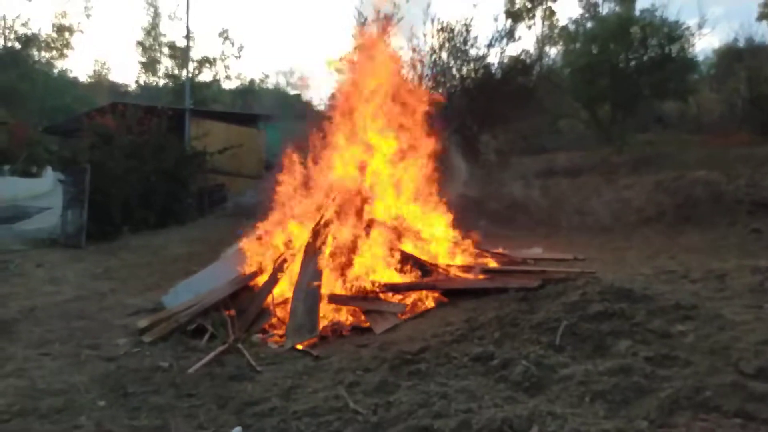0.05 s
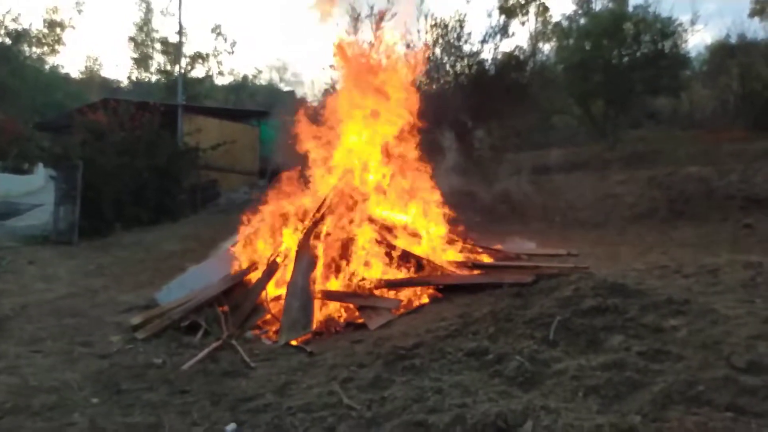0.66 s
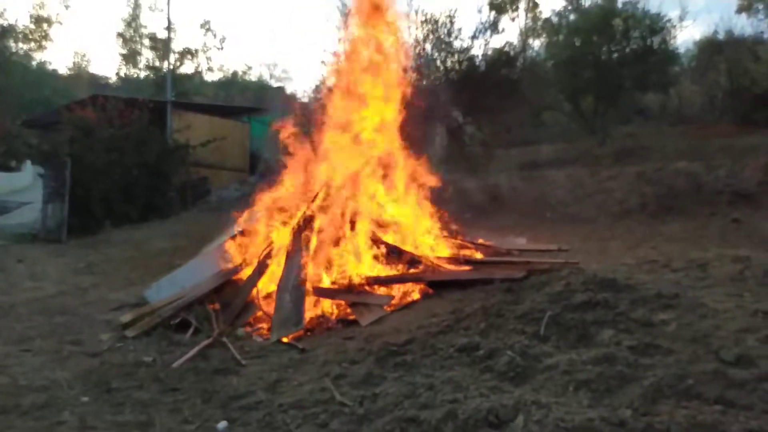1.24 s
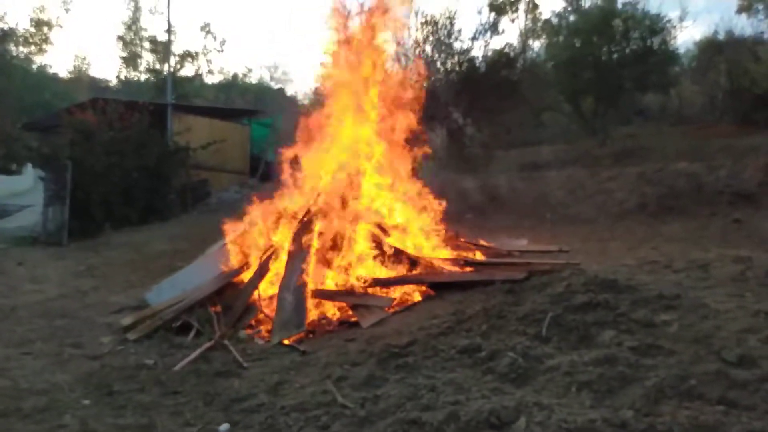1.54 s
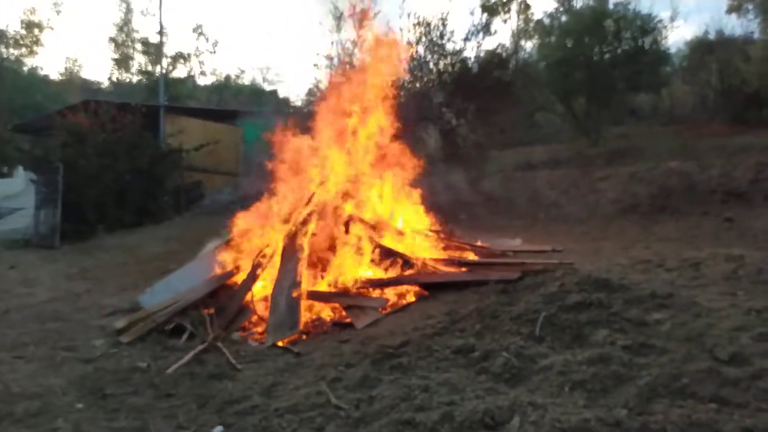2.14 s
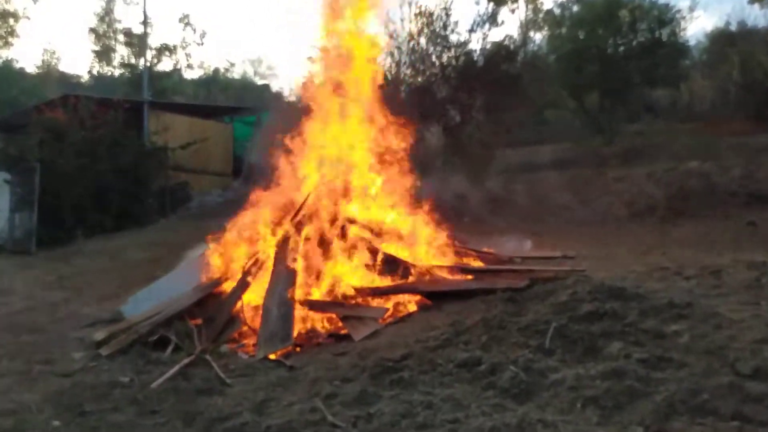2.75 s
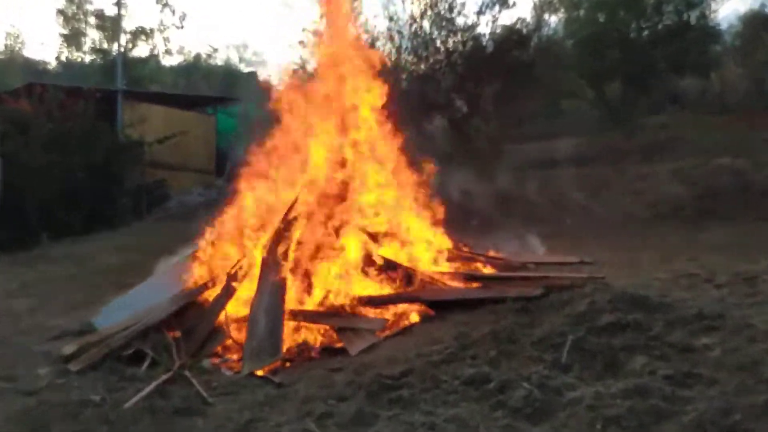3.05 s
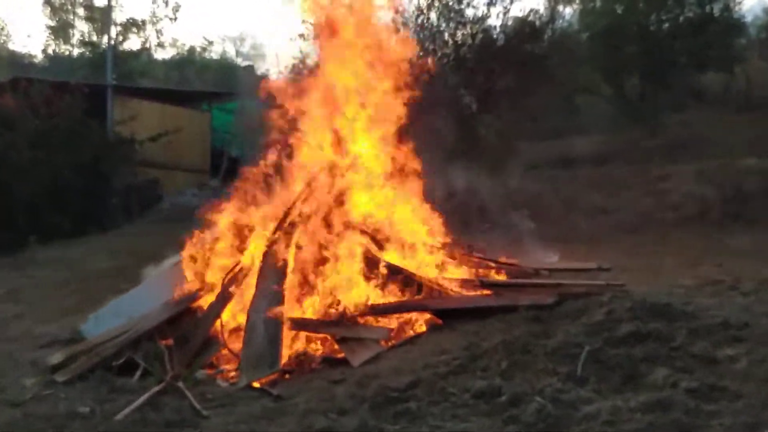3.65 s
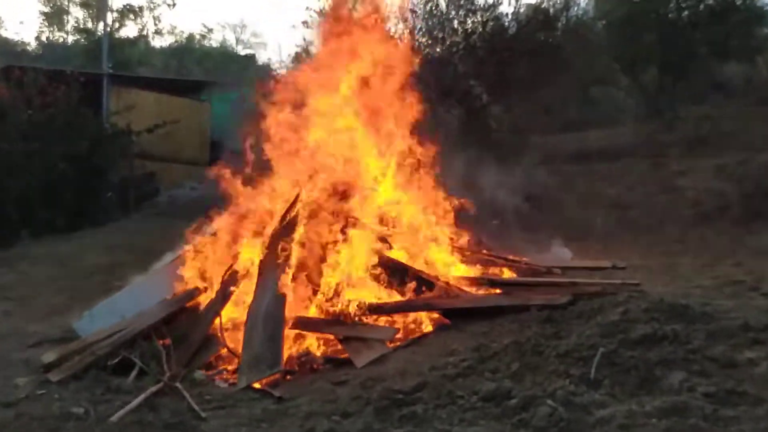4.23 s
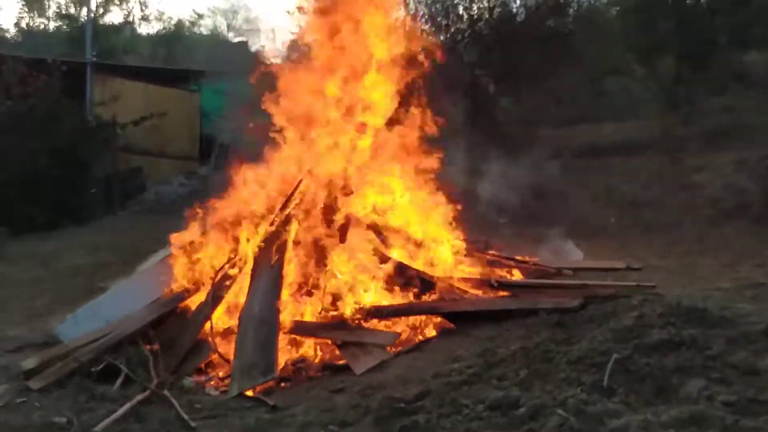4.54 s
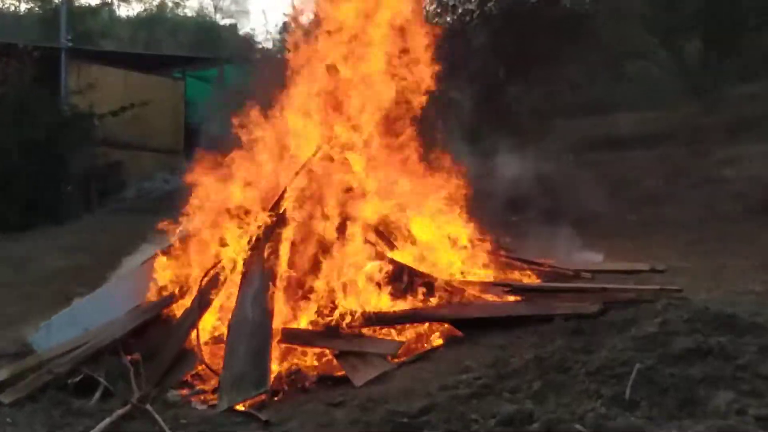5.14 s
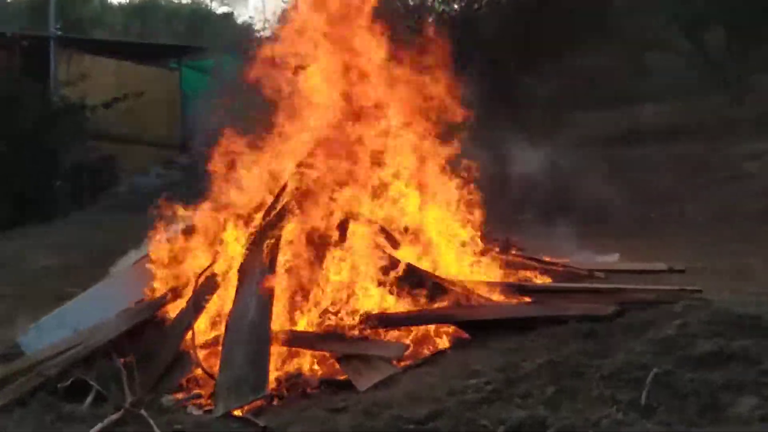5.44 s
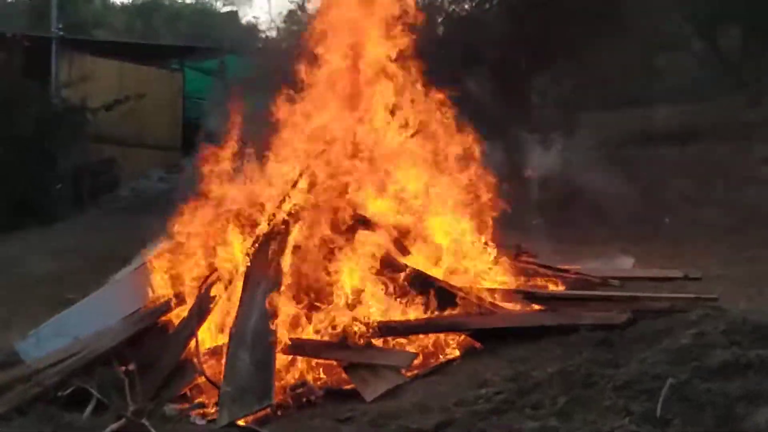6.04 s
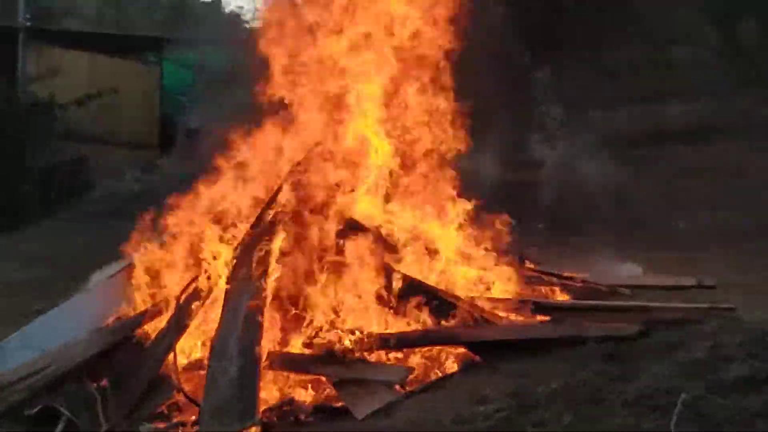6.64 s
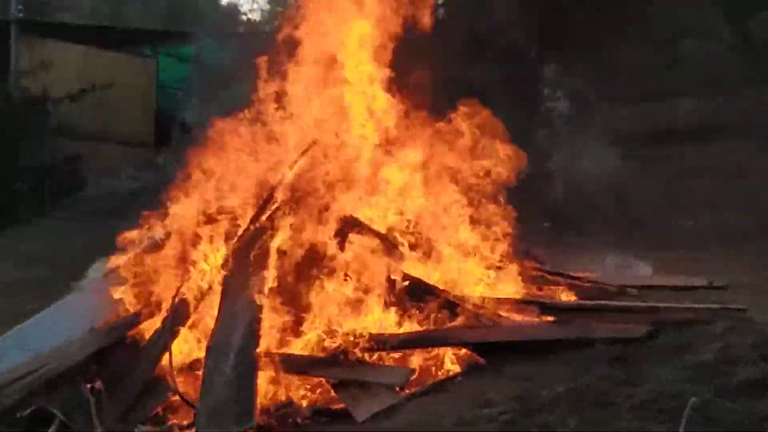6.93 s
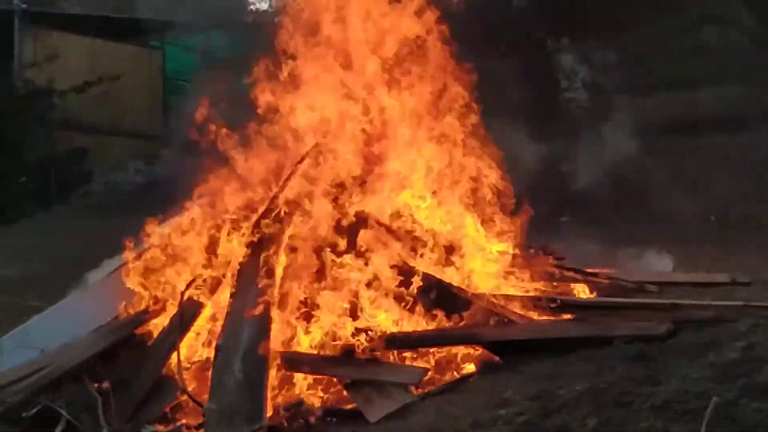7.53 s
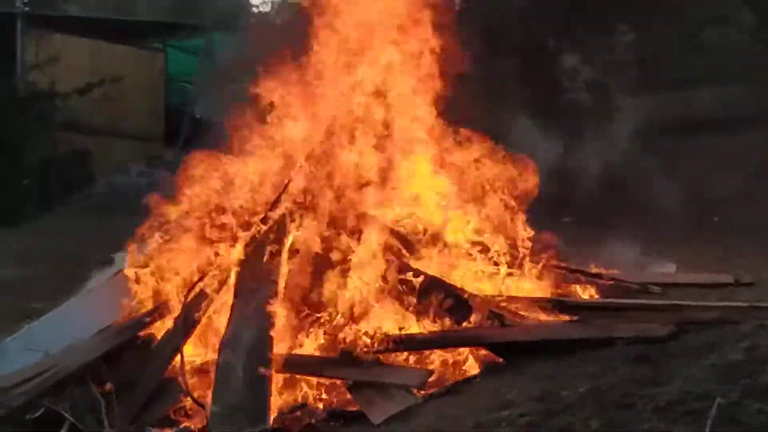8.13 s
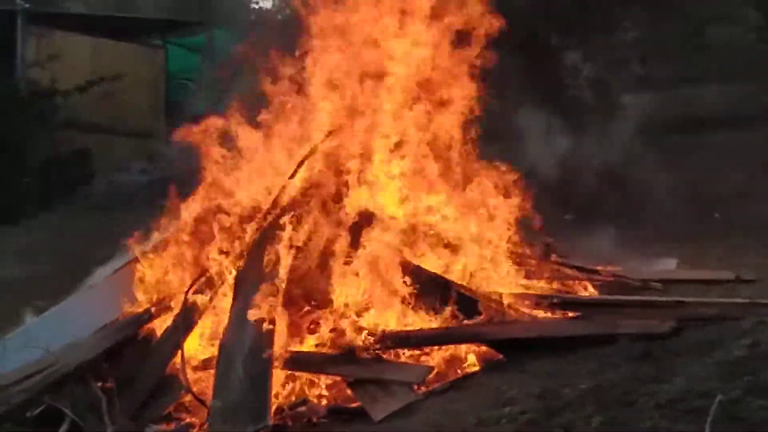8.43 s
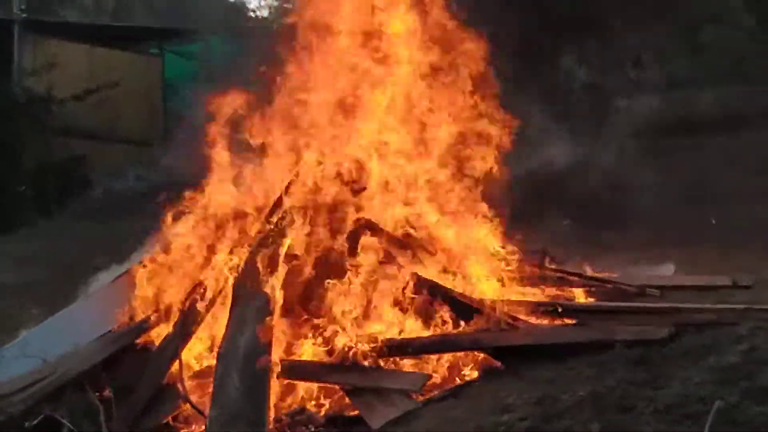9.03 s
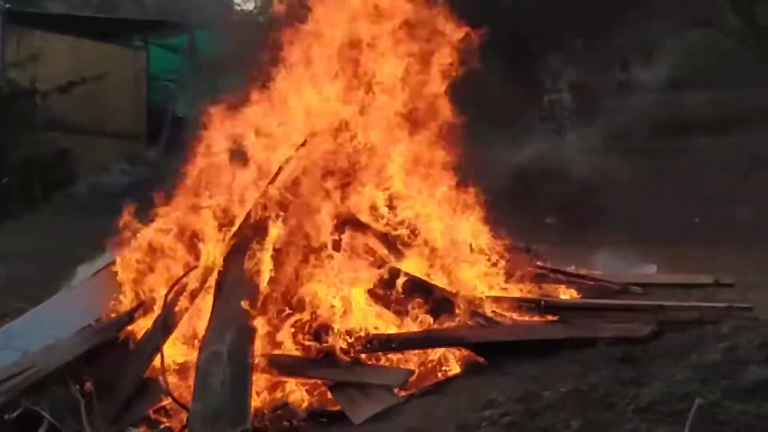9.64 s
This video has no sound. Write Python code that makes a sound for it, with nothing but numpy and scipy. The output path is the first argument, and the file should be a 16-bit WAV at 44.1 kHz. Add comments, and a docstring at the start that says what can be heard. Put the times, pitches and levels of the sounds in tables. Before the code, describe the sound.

A bonfire of old planks burns on open ground a few metres away, crackling without a break for about ten seconds. Sharp wooden cracks and bright snaps come irregularly, roughly a dozen a second, with many smaller pops between them. Beneath are a fine ticking sizzle and the soft, steady low rumble of flames. Stronger pops stand out around 0.5, 0.9, 1.9, 2.5, 5.5, 6.4 and 7.9 seconds. Occasional duller knocks from thick wood blend in, for example near 0.2, 2.3, 3 and 7.1 seconds. Steam sputters briefly and faintly around 1.3, 3.7 and 6.2 seconds. The sizzle swells and eases slightly, but the fire stays even overall. The sound is crisp and dry, with only a slight scatter off the ground.

```python
"""On open ground, a few metres away, a bonfire of old planks burns.
Pockets of steam and resin burst in the wood, and each sudden release of stress radiates a pop:
a crack of the plank plus a bright snap of splitting fibres, scattered back by the rough ground.
Deeper splits knock and escaping steam sputters. Small pops and a ticking sizzle fill the gaps,
over the soft rumble of turbulent flames."""
import sys
import numpy as np
from scipy import signal
from scipy.fft import rfft, irfft, next_fast_len
from scipy.io import wavfile

SR = 44100
rng = np.random.default_rng(int(sys.argv[2]) if len(sys.argv) > 2 else 0)


def transcribe(u):
    """Save the signal u as a 16-bit wav file named by the first command-line argument.

    u: samples, shape (n,) or (channels, n), limited to [-1, 1]; the rate is SR.
    q: integer samples, one column per channel.
    """
    v = np.clip(np.atleast_2d(u).T, -1, 1)
    q = np.round(v * 32767).astype(np.int16)
    wavfile.write(sys.argv[1], SR, q)


N = 431298

# loud ruptures: start_s, crack_db, snap_db
LOUD_POPS = [(0.0186, -28, -28), (0.069, -54, -25), (0.139, -35, -20), (0.2685, -27.5, -37),
             (0.3528, -23.5, -22.5), (0.466, -22.5, -26.5), (0.4998, -15, -20), (0.59, -19, -13.5),
             (0.6357, -25, -20.5), (0.716, -36, -28.5), (0.8308, -22.5, -34), (0.863, -21, -12),
             (0.876, -24.5, -25), (0.921, -23, -32), (1.0416, -33.5, -73), (1.104, -27, -25),
             (1.1373, -23, -25), (1.236, -20, -18), (1.385, -21, -22), (1.4405, -25, -26.5),
             (1.4881, -26.5, -65), (1.579, -29.5, -29.5), (1.7516, -23.5, -19), (1.797, -36, -21.5),
             (1.8719, -16.5, -11.5), (2.0917, -27, -17.5), (2.1102, -16, -45), (2.139, -23, -27),
             (2.2044, -34, -17), (2.2169, -27.5, -17), (2.3642, -22, -42), (2.3865, -19.5, -24),
             (2.5008, -28, -18), (2.5283, -15, -19), (2.6002, -28.5, -21.5), (2.644, -25, -54),
             (2.7986, -30, -71), (3.083, -28, -15.5), (3.2217, -30.5, -30), (3.3434, -28, -21.5),
             (3.3947, -26, -32), (3.533, -27, -55), (3.5864, -31.5, -22), (3.6997, -28, -14.5),
             (3.8061, -25.5, -13.5), (3.9529, -22, -37), (4.0268, -16.5, -18.5), (4.043, -29.5, -24),
             (4.1451, -25.5, -26), (4.1973, -28.5, -22), (4.2807, -25, -19), (4.357, -29, -22.5),
             (4.4273, -26, -28.5), (4.527, -22.5, -24), (4.6004, -19.5, -29.5), (4.6726, -26.5, -20),
             (4.7063, -25.5, -31), (4.9059, -30, -48), (4.9622, -53, -20), (4.9774, -19, -48),
             (5.0721, -28.5, -13.5), (5.1469, -21, -45), (5.3017, -30.5, -19.5), (5.387, -32, -62),
             (5.5177, -20, -13.5), (5.6187, -24.5, -17.5), (5.6386, -29, -21), (5.802, -34, -28),
             (5.8687, -26.5, -13.5), (6.033, -17.5, -16), (6.097, -23, -25), (6.135, -24.5, -14),
             (6.1481, -21.5, -47), (6.2541, -24, -54), (6.307, -29, -21), (6.359, -24, -36),
             (6.369, -12.5, -19.5), (6.5051, -27.5, -19.5), (6.5731, -28.5, -17), (6.6419, -26, -13.5),
             (6.7653, -19.5, -17), (6.8128, -27.5, -21), (6.8845, -18, -53), (6.942, -48, -24),
             (7.1316, -22.5, -16), (7.2463, -19, -22.5), (7.2825, -28, -25), (7.3784, -21.5, -18.5),
             (7.4334, -23.5, -14.5), (7.4467, -22, -18), (7.5068, -26.5, -20.5), (7.5184, -32.5, -17),
             (7.568, -33, -80), (7.7978, -23, -36), (7.807, -20.5, -21), (7.9215, -15.5, -21),
             (8.009, -41, -25.5), (8.2287, -28.5, -21.5), (8.3678, -23.5, -16.5), (8.3876, -23, -44),
             (8.49, -26, -29), (8.5395, -18, -16.5), (8.669, -28.5, -15.5), (8.8363, -21.5, -26),
             (8.9702, -29.5, -29.5), (9.107, -25, -33), (9.361, -26.5, -51), (9.4789, -17, -29),
             (9.6073, -24, -31), (9.6616, -21, -28.5), (9.747, -20.5, -20.5)]
# spectrum of a cracking plank: frequency_hz, relative_db
CRACK_SPECTRUM = [(100, -15.5), (400, -13), (650, -7.5), (1000, -7.5), (1400, -4), (2800, -3), (5000, -8.5),
                  (15000, -9)]
# spectrum of snapping fibres: frequency_hz, relative_db
SNAP_SPECTRUM = [(2000, -21), (4000, -1.5), (7200, -4), (8200, 3.5), (9000, 3.5), (10200, -0.5),
                 (12500, -6), (15800, -21)]
# rise time over decay time: wood parts at once, fibres tear up to their break
CRACK_SWELL, SNAP_SWELL = 0.46, 0.87


def from_db(db):
    """Decibels express an amplitude ratio on a logarithmic scale."""
    return 10 ** (np.asarray(db) / 20)


def unit_rms(x):
    """Division by the root mean square gives a signal unit power."""
    return x / np.sqrt(np.mean(x ** 2) + 1e-20)


def drift(corner_hz):
    """Low-passed noise is a smooth random fluctuation, here of unit rms."""
    step, settle = 40, 2000
    pole = np.exp(-2 * np.pi * corner_hz * step / SR)
    noise = rng.standard_normal(N // step + settle + 2)
    slow = signal.lfilter([1], [1, -2 * pole, pole * pole], noise)[settle:]
    return np.interp(np.arange(N) / step, np.arange(len(slow)), unit_rms(slow))


def response(spectrum, size):
    """Minimum phase: folding the cepstrum gives a causal filter with the given magnitude spectrum."""
    hz, db = np.transpose(spectrum)
    bins = np.maximum(np.fft.rfftfreq(size, 1 / SR), 1)
    magnitude = from_db(np.interp(np.log(bins), np.log(hz), db))
    cepstrum = irfft(np.log(magnitude), size)
    cepstrum[1:size // 2] *= 2
    cepstrum[size // 2 + 1:] = 0
    return np.exp(rfft(cepstrum))


def coloured(x, spectrum):
    """Linear filtering multiplies a signal's spectrum by a frequency response."""
    size = 2 * next_fast_len(N // 2 + SR // 10)
    return irfft(rfft(x, size) * response(spectrum, size), size)[..., :N]


def two_ports(mid, side, apart_hz):
    """Spatial coherence: long waves reach both microphone ports alike; above apart_hz they differ."""
    side = signal.lfilter(*signal.butter(1, apart_hz, "high", fs=SR), side)
    return np.stack([mid + side, mid - side])


def flames(level_db=-48.5, side_db=-15.0):
    """Turbulence in the column of hot gas radiates a steady low rumble."""
    # spectrum of the turbulence: frequency_hz, relative_db
    rumble_spectrum = [(15, -4.5), (38, 1), (125, -10), (180, -5.5), (300, -12.5), (450, -26),
                       (1500, -32.5)]
    mid, side = coloured(rng.standard_normal((2, N)), rumble_spectrum)
    return unit_rms(mid + from_db(side_db) * side * [[1], [-1]]) * from_db(level_db)


def sizzle(blaze_db, level_db=-44.0, follows_blaze=0.29, ticks_per_s=160, tick_s=0.0017, split_hz=4000):
    """Shot noise: tiny ruptures, dull inside the wood and bright on its surface, over a hiss of steam."""
    # spectrum of the ticks and steam: frequency_hz, relative_db
    sizzle_spectrum = [(300, 4.5), (2100, 1.5), (6900, -8), (8300, 2), (9200, 6.5), (11500, -1),
                       (13500, -11), (15000, -32)]
    steam, tick_pole = from_db(-8.0), np.exp(-1 / (tick_s * SR))
    bands = 0
    for kind in ("low", "high"):
        onsets = rng.random(N) < ticks_per_s / SR
        ticks = onsets * from_db(4.5 * np.minimum(rng.exponential(size=N), 5))
        envelope = signal.lfilter([1], [1, -tick_pole], ticks + 1e-18) + steam
        grains = rng.standard_normal((2, N)) * envelope
        flicker = from_db(3.5 * drift(corner_hz=19.0))
        bands = bands + signal.lfilter(*signal.butter(2, split_hz, kind, fs=SR), grains * flicker)
    hiss = unit_rms(coloured(two_ports(*bands, apart_hz=2180), sizzle_spectrum))
    return hiss * from_db(level_db + follows_blaze * blaze_db)


def ruptures(times, levels_db, spectrum, edge_hz, edge_q, edge_spread, ring_hz, decay_s, length_spread,
             break_db, swell_share):
    """Source and filter: tearing excites the wood, a resonant low-pass. Levels are rms over 5 ms."""
    count, size, lead_s = len(times), 1000, 0.003
    t = np.arange(size) / SR
    length, depth, place, piece, bearing = np.clip(rng.standard_normal((count, 5)), -2, 2).T[:, :, None]
    decay = decay_s * np.exp(length_spread * length)
    # the tear runs away to a break and dies at once; scatter inside the pile lingers
    since_break = t - lead_s - decay / 2
    swell = np.exp(np.minimum(since_break, 0) / (decay * swell_share))
    after = np.maximum(since_break, 0) / decay
    envelope = swell * (np.exp(-after) + from_db(-15.5) * np.exp(-after / 4))
    mid, side = rng.standard_normal((count, 2, size)).swapaxes(0, 1) * envelope
    # the break is one pressure pulse, its energy break_db relative to all the tearing
    impulse = np.diff(1.0 * (since_break > 0), prepend=0)
    pulse = impulse * from_db(break_db) * np.linalg.norm(envelope, axis=1, keepdims=True)
    source = two_ports(mid + pulse, side + pulse * bearing, apart_hz=3630)
    # every piece of wood has its own upper edge and one short ring
    hz = np.maximum(np.fft.rfftfreq(size, 1 / SR), 1)
    ratio = hz / (np.reshape(edge_hz, (-1, 1)) * np.exp(edge_spread * depth))
    detune = hz / (ring_hz * np.exp(0.25 * piece))
    ring_db, ring_q = 5.5, 6.8
    ring = 1 + (from_db(ring_db) - 1) / (1 + 1j * ring_q * (detune - 1 / detune))
    wood = ring / (1 - ratio ** 2 + 1j * ratio / edge_q)
    # interference with the ground reflection hollows the tone
    bounce_s = 0.0014 * np.exp(0.1715 * place)
    ground = 1 + 0.47 * np.exp(-2j * np.pi * hz * bounce_s)
    waves = irfft(rfft(source) * wood * ground * response(spectrum, size))
    power = (waves ** 2).mean(0).sum(1) / (0.005 * SR)
    waves = waves * (from_db(levels_db) / np.sqrt(power))[:, None]
    starts = np.clip(np.round((times - lead_s) * SR).astype(int), 0, N)
    out = np.zeros((2, N + size))
    for k, start in enumerate(starts):
        out[:, start:start + size] += waves[:, k]
    return out[:, :N]


def loud_pops():
    """Brittle fracture gives a crack and a snap; depth weakens the snap, dulls and draws out the crack."""
    times, crack_db, snap_db = np.transpose(LOUD_POPS)
    depth_db = crack_db - snap_db
    edge_hz = 4530 * from_db(-0.22 * depth_db)
    decay_s = 0.0013 * from_db(0.013 * depth_db)[:, None]
    cracks = ruptures(times, crack_db, CRACK_SPECTRUM, edge_hz, edge_q=1.0, edge_spread=0, ring_hz=2174,
                      decay_s=decay_s, length_spread=0.38, break_db=0.0, swell_share=CRACK_SWELL)
    snaps = ruptures(times, snap_db, SNAP_SPECTRUM, edge_hz=9520, edge_q=3.16, edge_spread=0.084,
                     ring_hz=9830, decay_s=0.0012, length_spread=0.45, break_db=-2.5,
                     swell_share=SNAP_SWELL)
    return cracks + snaps


def ground_echo(x, delay_s=0.017, near_t60_s=0.042, far_t60_s=0.28, far_db=3.0, level_db=-13.5):
    """Diffuse scattering: rough ground returns the treble, briefly from nearby, longer from far off."""
    t = np.arange(SR // 2) / SR - delay_s
    fade = from_db(-60 * t / near_t60_s) + from_db(far_db - 60 * t / far_t60_s)
    scatter = rng.standard_normal((2, len(t))) * (t > 0) * fade
    scatter = scatter / np.sqrt((scatter ** 2).sum() / 2)
    treble = signal.lfilter(*signal.butter(1, [5000, 12000], "band", fs=SR), scatter)
    return from_db(level_db) * signal.fftconvolve(x, treble, axes=1)[:, :N]


def small_ruptures(times, crack_db, snap_db, decay_s=0.0014):
    """Small fractures vary in bandwidth and damping, from a clean click to a drawn-out rasp."""
    cracks = ruptures(times, crack_db, CRACK_SPECTRUM, edge_hz=2570, edge_q=1.48, edge_spread=0.56,
                      ring_hz=1750, decay_s=decay_s, length_spread=0.55, break_db=-9,
                      swell_share=CRACK_SWELL)
    snaps = ruptures(times, snap_db, SNAP_SPECTRUM, edge_hz=24000, edge_q=0.56, edge_spread=0.5,
                     ring_hz=9700, decay_s=decay_s, length_spread=0.33, break_db=-10.5,
                     swell_share=SNAP_SWELL)
    return cracks + snaps


def small_pops(blaze_db, count=260, follows_blaze=0.36, gap_s=0.007, top_db=-28.5, splinter_db=-16.0):
    """A clustered random process: wood gives way in two steps, in flurries that follow the blaze."""
    when, lateness, rank = np.split(rng.random((count, 5)), [1, 3], axis=1)
    flurry_db = 1.42 * drift(corner_hz=14)
    burnt = np.cumsum(from_db(follows_blaze * blaze_db + flurry_db))
    step_s = np.searchsorted(burnt, when * burnt[-1]) / SR + np.cumsum(2 * gap_s * lateness, axis=1)
    step_db = top_db - 20 * np.log10(1 + rank.ravel() * from_db(12.5))  # weak pops outnumber strong
    # two splinters follow each loud pop after log-normal delays
    parents = np.repeat(LOUD_POPS, 2, axis=0)
    lag_s = 0.013 * np.exp(0.99 * rng.standard_normal(len(parents)))
    times = np.concatenate([step_s.ravel(), parents[:, 0] + lag_s])
    level_db = np.concatenate([step_db, parents[:, 1:].max(1) + splinter_db])
    # the division of energy makes anything from a dull tock to a thin tick
    snap_share = 1 / (1 + from_db(-85 * (rng.random(len(times)) - 0.35)))
    crack_db = level_db + 10 * np.log10(1 - snap_share)
    snap_db = level_db + 10 * np.log10(snap_share)
    return small_ruptures(times, crack_db, snap_db)


def knocks():
    """Impulsive excitation: thick planks split inside and answer with a low, longer knock."""
    # splits deep in thick wood: start_s, level_db
    deep_splits = [(0.1801, -24.5), (1.879, -24), (2.264, -23), (3.0007, -28), (3.0956, -27), (5.6155, -24),
                   (7.137, -25.5), (8.129, -26.5), (9.7754, -26)]
    # spectrum of a thick plank: frequency_hz, relative_db
    knock_spectrum = [(80, -43), (180, 5.5), (400, -1), (700, -2.5), (1600, -0.5), (6000, -23.5)]
    times, level_db = np.transpose(deep_splits)
    return ruptures(times, level_db, knock_spectrum, edge_hz=4100, edge_q=0.91, edge_spread=0.09,
                    ring_hz=1350, decay_s=0.001984, length_spread=0.46, break_db=-1.5,
                    swell_share=CRACK_SWELL)


def sputters(count=12, spread_db=4.5):
    """Steam under pressure forces its way out as an irregular pulse train of tiny pops."""
    # spurts of steam, with the mean levels of one pop: start_s, length_s, crack_db, snap_db
    spurts = [(1.245, 0.16, -36, -36), (3.7, .12, -50, -33), (4.785, 0.023, -50, -40),
              (6.18, 0.14, -41, -33), (7.3, 0.1, -45, -36), (7.905, .03, -31, -30.5)]
    start_s, length_s, crack_db, snap_db = np.repeat(spurts, count, axis=0).T
    progress = (np.arange(len(start_s)) % count + rng.random(len(start_s))) / count
    crack_jitter, snap_jitter = spread_db * rng.standard_normal((len(start_s), 2)).T
    return small_ruptures(start_s + progress * length_s, crack_db + crack_jitter, snap_db + snap_jitter)


def scene():
    """Superposition: the pops and their echoes add to the sizzle and the rumble."""
    # how fiercely the surface burns: time_s, relative_db
    blaze_curve = [(0.0, -48), (2.561, -45), (2.91, -52.5), (3.76, -46), (5.69, -45), (6.431, -41),
                   (7.049, -47.5), (7.402, -43), (8.9, -50.5), (9.78, -47)]
    blaze_db = np.interp(np.arange(N) / SR, *np.transpose(blaze_curve))
    blaze_db = blaze_db - blaze_db.mean()
    crackle = loud_pops() + knocks() + sputters() + small_pops(blaze_db)
    return crackle + ground_echo(crackle) + sizzle(blaze_db) + flames()


def record(dry, cutoff_hz=15900):
    """Transduction: each port colours the sound, the left lags, peaks clip and the top is cut."""
    # colour contrast between the microphone ports: frequency_hz, left_minus_right_db
    port_contrast = [(200, 0.5), (1000, -1.5), (1500, -3), (2400, 12.5), (3300, 1), (6500, -4), (9300, -3),
                     (13000, 8.5), (15500, -1.5)]
    left = coloured(dry[0], [(hz, db / 2) for hz, db in port_contrast])
    right = coloured(dry[1], [(hz, -db / 2) for hz, db in port_contrast])
    left = np.concatenate([np.zeros(2), left[:-2]])
    low_pass = signal.butter(16, cutoff_hz, fs=SR, output="sos")
    return signal.sosfiltfilt(low_pass, np.clip([left, right], -1, 1))


dry = scene()
out = record(dry)
transcribe(out)
```